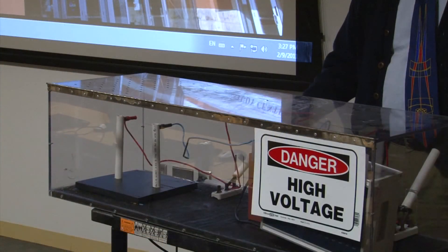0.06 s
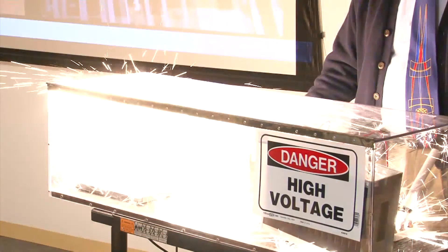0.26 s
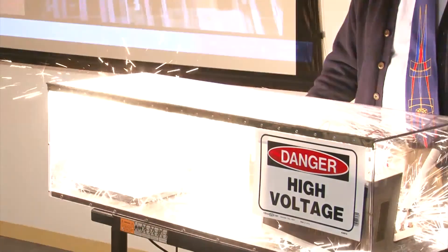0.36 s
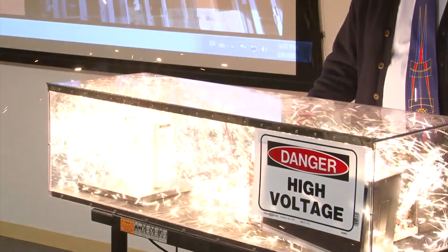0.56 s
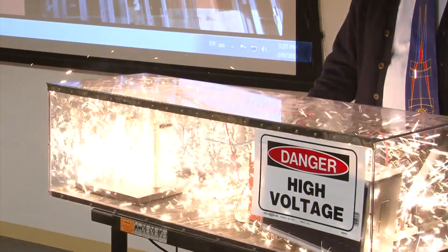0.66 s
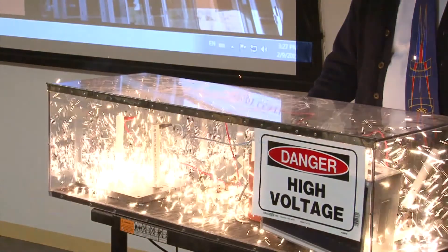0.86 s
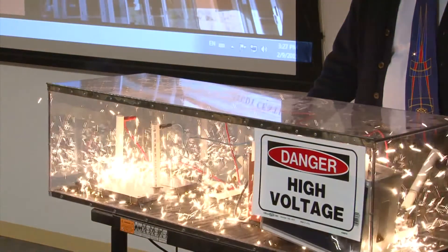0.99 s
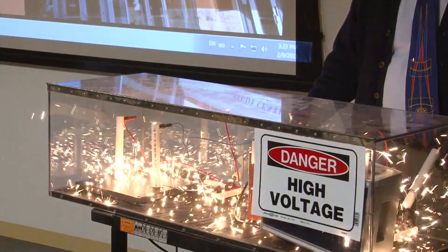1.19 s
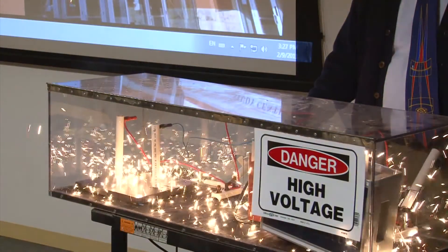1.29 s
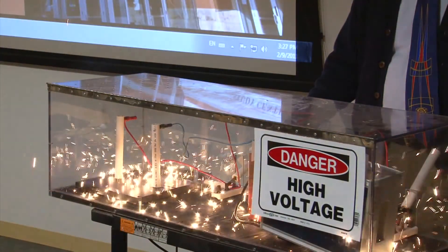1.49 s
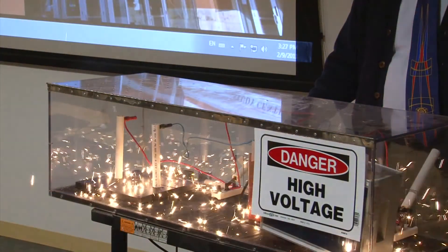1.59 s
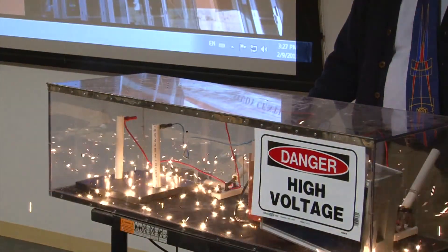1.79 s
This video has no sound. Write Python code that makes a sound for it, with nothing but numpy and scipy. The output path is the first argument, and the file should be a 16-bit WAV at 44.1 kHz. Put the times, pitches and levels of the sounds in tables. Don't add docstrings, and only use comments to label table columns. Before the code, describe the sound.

Quiet ventilation and a faint charger hum, then a sudden gunshot-like wire explosion overloads the microphone in the right channel; dense reverberation and low booms decay, with tiny ember ticks near the end. Left is mostly hiss.

```python
import sys
import numpy as np
from scipy import signal
from scipy.fft import rfft, irfft, next_fast_len
from scipy.io import wavfile
from scipy.ndimage import uniform_filter1d, minimum_filter1d

SR = 44100
rng = np.random.default_rng(int(sys.argv[2]) if len(sys.argv) > 2 else 0)


def persist_wave(psi):
    counts = np.round(np.clip(psi, -1, 1) * 32767).astype(np.int16)
    wavfile.write(sys.argv[1], SR, np.atleast_2d(counts).T)


def attenuation_scalar(level_db):
    decades = np.asarray(level_db, float) / 20
    return 10 ** decades


N = 81585

BANG_S, PUSH_S, PUSH_DB = 0.2174, 0.0024, -7.5

# (time [s], peak level [dB])
ECHOES = [(0.2209, -1.5), (0.2234, 1), (0.228, 4), (.2287, -0.5), (0.2315, 2), (.2378, -2.5), (.2510, -4),
          (0.2577, 0), (.2598, -3), (0.2633, 1), (0.2698, -3.5), (0.2723, -4.5)]
# (frequency [Hz], level [dB], T60 [s])
BOX_MODES = [(61.3, -9.5, .4), (100.2, -17.5, .5), (187.7, -23.5, .6), (282, -17, 0.23),
             (497.7, -22.5, 0.67), (1098, -19, .35), (1314, -17, 0.13), (1435, -12.5, .3),
             (1653, -19, 0.17), (2099, -19.5, .25)]
# (time [s], level [dB], frequency [Hz])
SWELLS = [
    (.23, -17, 458.4),
    (.29, -13.5, 304.8),
    (0.319, -18, 201.6),
    (0.551, -27, 354.1),
    (0.561, -30, 308.4),
    (0.819, -35, 304.4),
    (1.029, -39, 135.7),
    (1.33, -54.5, 303.4),
]
# (time [s], level [dB], frequency [Hz])
BOOMS = [(0.233, -18.5, 37.7), (0.329, -11, 57.9), (0.439, -14.5, 38.1), (0.518, -15.5, 42),
         (0.682, -21.5, 48), (0.759, -33, 36.9), (0.832, -31, 39.8), (0.979, -30, 51.01),
         (1.101, -29.5, 39.3), (1.181, -37, 54.09), (1.268, -32.5, 45.5), (1.351, -37.5, 36.6),
         (1.438, -39.5, 40.4)]
# (frequency [Hz], density [dB per Hz])
NEAR_SPECTRUM = [(76, -37.5), (130, -17.5), (390, -7.5), (459, -7), (997, -12.5), (1080, -12), (1400, -5.5),
                 (4790, -12), (6200, -19.5), (8060, -54), (13600, -120)]
# (frequency [Hz], T60 [s])
NEAR_T60 = [(100, .7), (300, 0.91), (600, 0.78), (1500, 0.76), (3000, 0.47), (6000, .4)]
# (frequency [Hz], density [dB per Hz])
FAR_SPECTRUM = [(35, -31.5), (60, 0), (170, -5.5), (400, -10.5), (900, -18), (1400, -15.5), (2400, -21),
                (4800, -33.5), (6200, -49.5), (8000, -120)]
# (frequency [Hz], T60 [s])
FAR_T60 = [(60, 2.2), (150, 1.9), (450, 2.18), (1200, 2.2), (2500, 1.32), (4500, .85)]
# (time [s], level [dB], frequency [Hz])
TICKS = [
    (1.458, -57, 2010),
    (1.461, -59, 2510),
    (1.462, -64, 3410),
    (1.470, -52, 2200),
    (1.484, -57, 3450),
    (1.485, -61, 2880),
    (1.488, -61, 3008),
    (1.494, -60, 3120),
]
# (frequency [Hz], density [dB per Hz])
AIR_SPECTRUM = [(15, -5), (30, 2.5), (70, -1.5), (105, -2), (170, -11), (250, -31.5), (450, -27),
                (1000, -48), (2000, -68)]
# (frequency [Hz], density [dB per Hz])
HISS_SPECTRUM = [(20, 11.5), (200, 4.5), (1000, 1), (4200, -3.5)]
# (lower edge [Hz], treble level needed [dB])
TOP_BANDS = [(4300, -65.5), (4750, -47.5), (5050, -40), (5900, -33)]
# (frequency [Hz], density [dB per Hz])
FIZZ_SPECTRUM = [(4400, -38.5), (5000, -1.5), (6800, 1), (7600, -30.5)]
# (frequency [Hz], density [dB per Hz])
SKIRT_SPECTRUM = [(6200, -39.5), (6500, 1), (8200, -7.5), (8800, -38.5)]


def unit(x):
    return x / np.sqrt(np.mean(x ** 2) + 1e-20)


def along(points, hz):
    f, v = np.transpose(points)
    return np.interp(np.log(hz + 1), np.log(f + 1), v)


def since(s):
    return np.maximum(np.arange(N) / SR - s, 0)


def filtered(x, response):
    m = next_fast_len(N + 8192)
    hz = np.fft.rfftfreq(m, 1 / SR)
    return irfft(rfft(x, m) * response(hz), m)[..., :N]


def noise(spectrum, channels=1):
    white = rng.standard_normal((channels, N))
    return unit(filtered(white, lambda hz: attenuation_scalar(along(spectrum, hz))))


def narrow(centre_hz, width_hz):
    white = rng.standard_normal(N)
    return unit(filtered(white, lambda hz: 1 / (1 + ((hz - centre_hz) / width_hz) ** 2)))


def ring(s, db, hz, t60, rise):
    t = since(s)
    decay = attenuation_scalar(db - 60 * t / t60)
    return decay * (1 - np.exp(-t / rise)) * np.sin(2 * np.pi * hz * t)


def blast():
    u = since(BANG_S) / PUSH_S
    x = attenuation_scalar(PUSH_DB) * np.e * u * (1 - u / 2) * np.exp(-u)
    for s, db in ECHOES:
        hz = 1500 * np.exp(0.15 * rng.standard_normal())
        rng.standard_normal()
        x = x + ring(s - 0.0002, db + 4, hz, t60=0.003, rise=0.0001)
    return x


def tail(spectrum, t60s, db, at_s, rise, patchy_db):
    hz, t, z = signal.stft(noise(spectrum)[0], SR, nperseg=512)
    patches = uniform_filter1d(rng.standard_normal(z.shape), size=4, axis=0)
    patches = unit(uniform_filter1d(patches, size=8, axis=1))
    fall_db = -60 * (np.maximum(t, BANG_S) - at_s) / along(t60s, hz)[:, None]
    x = signal.istft(z * attenuation_scalar(db + fall_db + patchy_db * patches), SR, nperseg=512)[1][:N]
    return x * (1 - np.exp(-(since(BANG_S) / rise) ** 2))


def room():
    x = tail(NEAR_SPECTRUM, NEAR_T60, db=-8.5, at_s=BANG_S, rise=0.003, patchy_db=1.3)
    x = x + tail(FAR_SPECTRUM, FAR_T60, db=-33.5, at_s=0.6, rise=0.029, patchy_db=0.74)
    for hz, db, t60 in BOX_MODES:
        x = x + ring(BANG_S + 0.006 * rng.random(), db, hz, t60, rise=0.01)
    for s, db, hz in SWELLS:
        x = x + ring(s, db, hz, t60=0.41, rise=0.027)
    for s, db, hz in BOOMS:
        x = x + ring(s, db, hz, t60=0.23, rise=0.011)
    return x


def embers():
    return sum(ring(s, db, hz, t60=0.0069, rise=0.000194) for s, db, hz in TICKS)


def background():
    after = since(BANG_S) > 0
    ventilation = attenuation_scalar(-55 - 3 * after) * noise(AIR_SPECTRUM)[0]
    charger = attenuation_scalar(-69) * narrow(centre_hz=490, width_hz=12) * ~after
    return ventilation + charger


def limited(x):
    need = np.minimum(1, 0.8 / (np.abs(x) + 1e-9))
    return x * uniform_filter1d(minimum_filter1d(need, size=160), size=80)


def leakage(mic, loud):
    knee = 0.36
    bright = filtered(mic, lambda hz: hz / (hz + 800) * (hz < 4350))
    return attenuation_scalar(-36.5) * bright * loud ** 3 / (loud ** 3 + knee ** 3)


def lead_in():
    length_s = 0.012
    swell = np.clip(since(BANG_S - length_s) / length_s, 0, 1)
    return attenuation_scalar(-50.5) * rng.standard_normal(N) * swell * (since(BANG_S + length_s) == 0)


def preamplifier():
    hiss = attenuation_scalar(-73.5) * noise(HISS_SPECTRUM + [(4600, 2), (8000, -26.5)], channels=2)
    drift = np.cumsum(0.01 * rng.standard_normal(N))
    whine = attenuation_scalar(-87.5) * np.sin(2 * np.pi * 3840 * np.arange(N) / SR + drift)
    return (hiss + whine) * attenuation_scalar([[0], [-5]])


def fade_top_bands(x):
    hz, t, z = signal.stft(x, SR, nperseg=1024)
    treble = 4 / 3 * np.sum(np.abs(z[:, (hz > 2500) & (hz < 6000)]) ** 2, axis=1)
    treble_db = 10 * np.log10(np.abs(uniform_filter1d(treble, size=3, axis=1)) + 1e-20)
    keep = np.ones(z.shape) / (1 + (hz[:, None] / 6200) ** 160)
    wander = 110 * np.repeat(rng.standard_normal((2, 1, len(t))), 8, axis=2)[..., :len(t)]
    for from_hz, need_db in TOP_BANDS:
        is_open = np.clip(treble_db - need_db, 0, 1)[:, None]
        below = hz[:, None] < from_hz + wander * (from_hz < 4500)
        keep = keep * np.maximum(is_open, below)
    return signal.istft(z * keep, SR, nperseg=1024)[1][:, :N]


def overload(x):
    hardness = 13
    return x / (1 + np.abs(x) ** hardness) ** (1 / hardness)


def scene():
    mic = blast() + limited(room()) + embers() + background()
    return np.array([0 * mic, mic])


def band_limit(x):
    return signal.sosfilt(signal.butter(12, 15800, fs=SR, output="sos"), x)


def record(dry):
    loud = uniform_filter1d(np.abs(dry[1]), size=400)
    x = fade_top_bands(dry + [leakage(dry[1], loud), lead_in()] + preamplifier())
    x = filtered(overload(x), lambda hz: hz < 15800)
    x = x + attenuation_scalar(-98.5) * noise(FIZZ_SPECTRUM, channels=2) * [[1], [0.3]]
    skirt_gain = np.clip(loud / 0.36, 0, 1) ** 3
    x = x + attenuation_scalar(-53) * noise(SKIRT_SPECTRUM) * [0 * loud, skirt_gain]
    return band_limit(x)


dry = scene()
out = record(dry)
persist_wave(out)
```